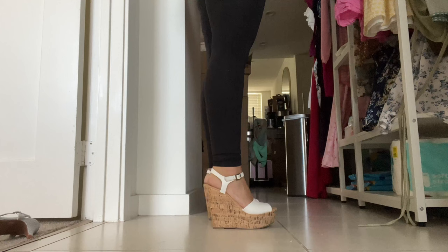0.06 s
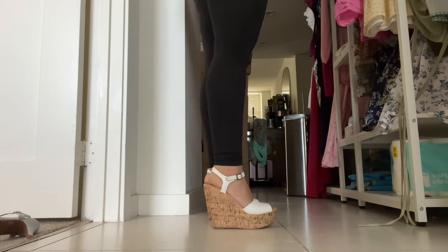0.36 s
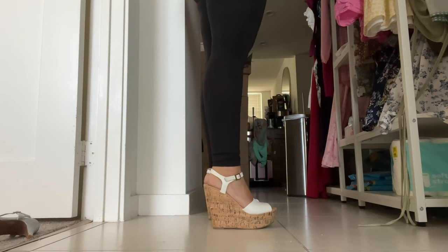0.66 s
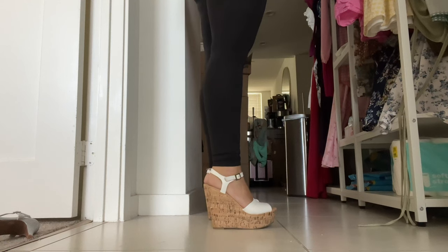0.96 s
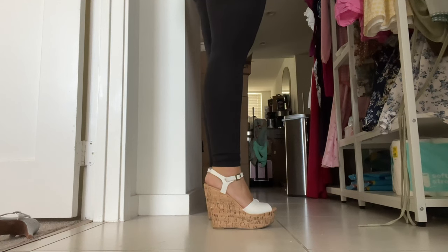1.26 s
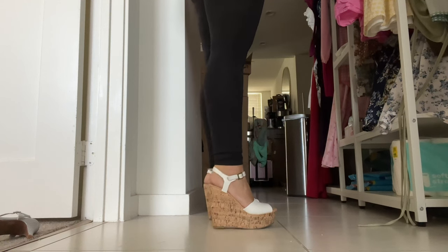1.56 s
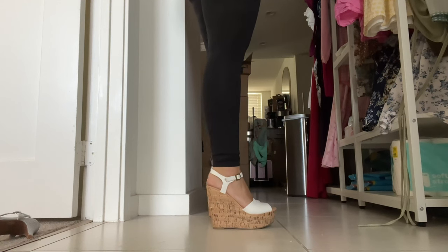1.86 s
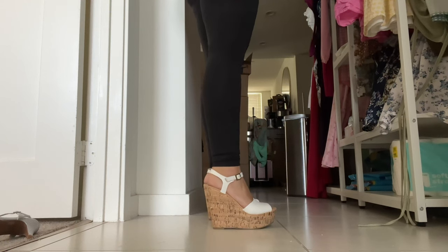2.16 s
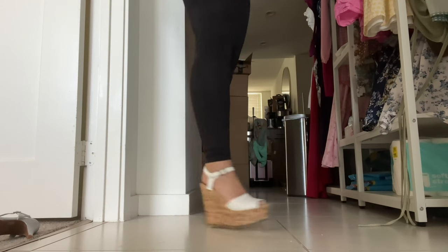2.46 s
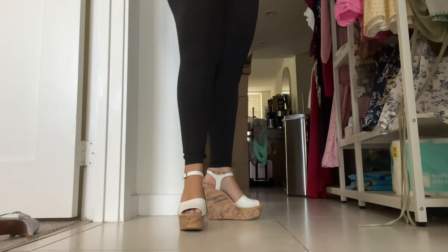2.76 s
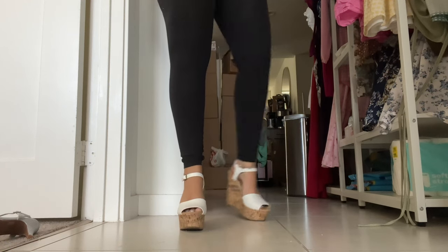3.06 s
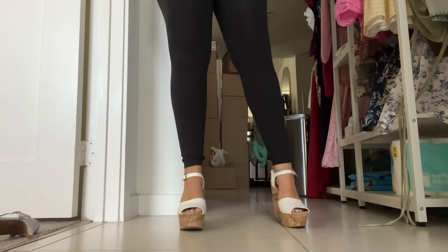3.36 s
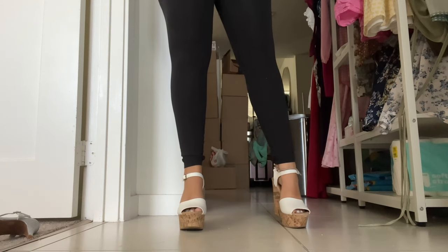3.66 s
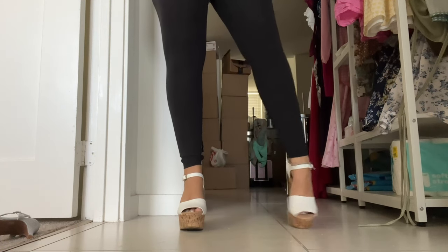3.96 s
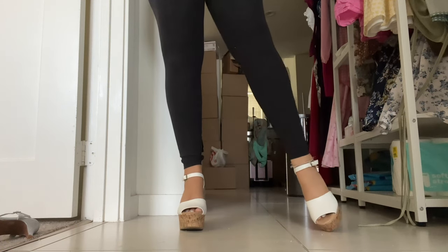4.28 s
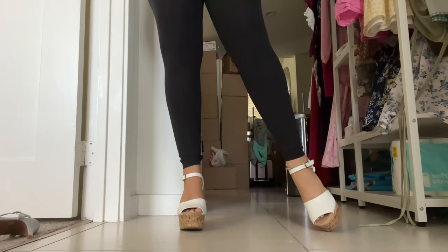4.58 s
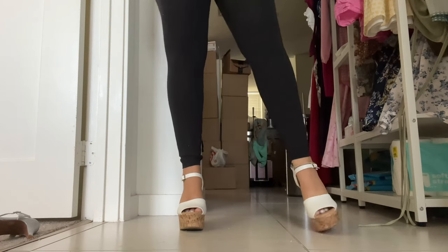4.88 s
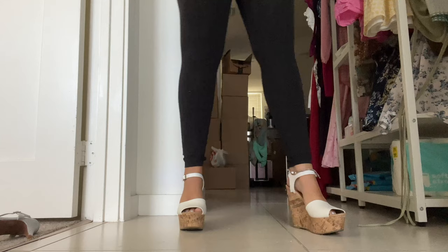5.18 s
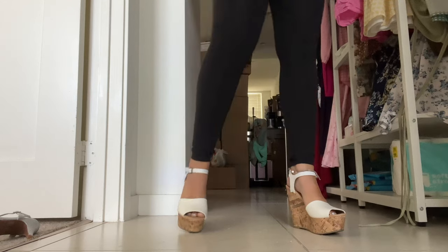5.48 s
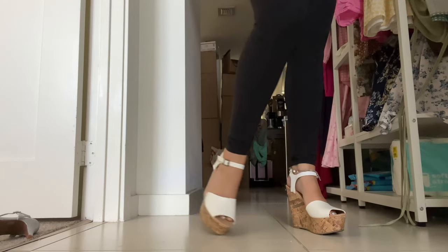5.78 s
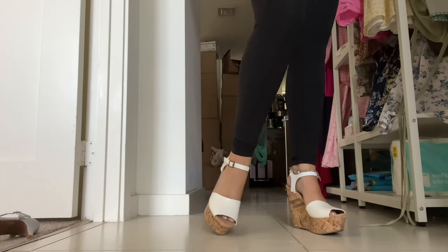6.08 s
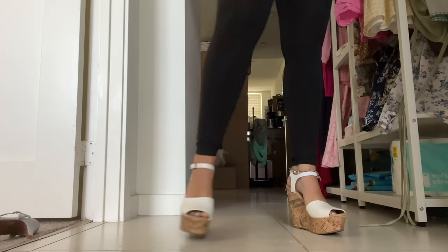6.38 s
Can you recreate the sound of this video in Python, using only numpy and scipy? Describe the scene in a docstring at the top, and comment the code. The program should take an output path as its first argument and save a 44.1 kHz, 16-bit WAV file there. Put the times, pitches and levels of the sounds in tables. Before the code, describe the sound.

A cork wedge sandal raps a tile floor five times in about two seconds, heard close at floor level in a narrow hallway. Softer, duller steps follow with longer gaps, one of them a heavier thud. Between them the leather straps creak and click, small buckles tick and leggings rustle faintly. A low appliance hum and room noise run underneath.

```python
"""Cork wedge sandals on a tiled floor in a narrow hallway, heard close by at floor level.
One foot raps the tile five times, then the wearer steps out and shifts her weight. Each blow arrives
through the tile, through the air and off the near walls, and excites the hallway's modes.
Straps creak, buckles ring, leggings rustle. An appliance hums; a faint whistle comes and goes."""
import sys
import numpy as np
from scipy import signal
from scipy.fft import rfft, irfft
from scipy.io import wavfile
from scipy.ndimage import uniform_filter1d

SR = 44100
rng = np.random.default_rng(int(sys.argv[2]) if len(sys.argv) > 2 else 0)


def waveform_to_disk(signal):
    """Save audio, clipped to [-1, 1], as 16-bit WAV at the path in sys.argv[1]."""
    frames = np.transpose(np.atleast_2d(signal))
    scaled = np.clip(frames, -1, 1) * 32767
    samples = np.round(scaled).astype(np.int16)
    wavfile.write(sys.argv[1], SR, samples)


N = 283563
TIME = np.arange(N) / SR
FFT_SIZE = 4096
HZ = np.fft.rfftfreq(FFT_SIZE, 1 / SR)

# sole on tile: (time [s], knock [dB], contact cut-off [Hz], thud [dB], grit [dB], pan L-R [dB],
# near-wall round trip [s], tile pitch [Hz])
FOOTFALLS = [(0.0594, -8.5, 1393, -28, -25.5, 1, 0.0039, 577),
             (0.564, -12, 1430, -21, -35, 0.5, 0.0044, 568),
             (0.9097, -12, 1510, -23, -31.5, -0.5, 0.0039, 570),
             (1.1390, -36.5, 1050, -27.5, -70, 6, 0.0034, 580),
             (1.1640, -46, 1220, -35.5, -64, -3.5, 0.0037, 545),
             (1.461, -18, 1110, -31.5, -44, 0, 0.0039, 570), (1.6731, -35, 690, -24, -48, 5, 0.00344, 515),
             (1.9248, -19, 1180, -29.5, -42.5, 0, 0.0039, 564),
             (2.693, -40.5, 900, -46, -77, 3, 0.0048, 547),
             (2.7252, -34, 428, -22.5, -70, 5.5, 0.00323, 364),
             (2.8245, -43.5, 810, -31, -56, 9, 0.00336, 427),
             (3.3133, -18, 537, -15.5, -36, 4.5, .0046, 411),
             (4.195, -54, 500, -42.5, -72, -3, 0.0034, 410), (5.039, -50.5, 70.6, -36, -75, 3, 0.0086, 410),
             (5.132, -39, 465, -28.5, -73, 0, 0.003, 414), (5.8130, -51.5, 1495, -45.5, -67, 7, .004, 558)]
# rubbing cloth: (frequency [Hz], level [dB])
CLOTH_SPECTRUM = [(600, -3.5), (1500, 2.5), (3000, 3), (5000, 0.5), (8000, -2), (13000, -2), (16000, -8.5)]


def from_db(db):
    return 10 ** (np.asarray(db) / 20)


def unit_rms(x):
    return x / np.sqrt(np.mean(x ** 2) + 1e-20)


def at_hz(rows, hz, column=1):
    """Interpolate a table column over log frequency."""
    table = np.array(rows)
    return np.interp(np.log(np.maximum(hz, 1)), np.log(table[:, 0]), table[:, column])


def delay(time_s):
    return np.exp(-2j * np.pi * HZ * time_s)


def add(out, time_s, sound):
    start = max(round(time_s * SR), 0)
    part = sound[..., :N - start]
    out[..., start:start + part.shape[-1]] += part


def swell(time_s, hold_s, attack_s, release_s, shape=1):
    """Envelope reaching 1 at time_s; shape 1 is pointed, 2 round."""
    before = np.maximum(time_s - TIME, 0) / attack_s
    after = np.maximum(TIME - time_s - hold_s, 0) / release_s
    return np.exp(-np.minimum(before + after, 10) ** shape)


def pulse(colour_db):
    """Spectrum of a minimum-phase pulse of height 1."""
    cepstrum = irfft(np.log(from_db(colour_db)))
    cepstrum[1:FFT_SIZE // 2] *= 2
    cepstrum[FFT_SIZE // 2 + 1:] = 0
    spectrum = np.exp(rfft(cepstrum))
    return spectrum / np.abs(irfft(spectrum)).max()


def stereo_noise(spectrum, coherent_hz):
    """Coloured noise, rms 1, alike in both ears well below coherent_hz."""
    hz = np.fft.rfftfreq(N, 1 / SR)
    mid, side = rfft(rng.standard_normal((2, N)))
    coherence = 1 / (1 + (hz / coherent_hz) ** 2)
    ears = np.sqrt(1 + coherence) * mid + np.sqrt(1 - coherence) * side * [[1], [-1]]
    return unit_rms(irfft(ears * from_db(at_hz(spectrum, hz)), N))


def house(noise_db, low_cut_hz):
    """Rumble and hiss of the house, plus an appliance's hum."""
    # room noise: (frequency [Hz], relative density [dB])
    noise_spectrum = [(13, -74.5), (22, -44), (59, -1), (118, -5.5), (147, -13.5), (210, -10.5),
                      (235, -18.5), (396, -22.5), (550, -23), (667, -28), (1330, -35), (1650, -43.5),
                      (1850, -46), (4840, -65), (15800, -75)]
    # appliance tones: (frequency [Hz], rms level [dB])
    hum_tones = [(118.4, -60.5), (209.9, -60.5), (328.4, -75.5)]
    air = from_db(noise_db) * stereo_noise(noise_spectrum, coherent_hz=325)
    air = signal.sosfilt(signal.butter(3, low_cut_hz, "high", fs=SR, output="sos"), air)
    hum = sum(from_db(db) * np.sin(2 * np.pi * (hz * TIME + rng.random())) for hz, db in hum_tones)
    return air + np.sqrt(2) * hum


def air_path(dip_db, dip_hz):
    """Air carries click and thump; the dipped midrange is mostly radiated by the tile."""
    octaves = np.log2(np.maximum(HZ, 1) / dip_hz)
    return from_db(dip_db * np.exp(-octaves ** 2 / 2))


def bending_wave(gain, travel_s, air_s, top_hz, left_lag_s):
    """Higher bending waves run faster: a falling chirp that outruns the air."""
    khz = np.maximum(HZ, 1) / 1000
    mortar_khz = 0.5  # the mortar bed keeps longer waves from slowing further
    delay_s = 2 * travel_s * (np.sqrt(khz + mortar_khz) - np.sqrt(mortar_khz)) / khz - air_s
    radiated = khz ** 2 / (khz ** 2 + 0.099) / (1 + (HZ / top_hz) ** 4)
    return gain * radiated * np.array([delay(delay_s + left_lag_s), delay(delay_s)])


def micro_slips(t60_s):
    """Spectrum of a dying burst of uneven slips, energy 1."""
    burst = rng.standard_normal(FFT_SIZE) * rng.exponential(1, FFT_SIZE)
    burst *= from_db(-60 * TIME[:FFT_SIZE] / t60_s)
    return rfft(burst / np.linalg.norm(burst))


def near_walls(trip_s, dull_hz):
    """Response per ear: direct sound plus dulled reflections off walls, door and rack."""
    # reflections per ear: (delay [near-wall round trips], gain [linear])
    left_echoes = [(.42, 0.094), (.55, 0.21), (1.0, 0.53), (1.54, 0.53), (2.02, 0.083)]
    right_echoes = [(.47, 0.12), (0.902, 1), (1.069, 0.15), (1.272, 0.31), (2.051, 0.55)]
    lowpass = 1 / (1 + 1j * HZ / dull_hz)
    return np.array([1 + lowpass * sum(gain * delay(trips * trip_s) for trips, gain in ear)
                     for ear in (left_echoes, right_echoes)])


def steps(thud_send_db):
    """Knock, thud and grit per blow; softer contact loses treble. Returns near sound, room send."""
    # wedge and tile under a perfectly hard blow: (frequency [Hz], level [dB])
    knock_spectrum = [(100, -30.5), (250, -12), (440, -3), (570, -4.5), (720, -6), (950, -5.5),
                      (1280, -2.5), (1600, -10), (2300, -9), (3100, -6), (4000, -7), (5300, -29.5),
                      (7000, -30), (12000, -29)]
    # body weight arriving on the floor: (frequency [Hz], level [dB])
    thud_spectrum = [(40, -33.5), (100, -12), (190, -3.5), (300, 0.5), (430, -0.5), (650, -9), (1200, -32),
                     (3000, -54)]
    # dust crushed under the sole: (frequency [Hz], level [dB])
    grit_spectrum = [(500, -21.5), (2000, 5.5), (3500, 9), (7000, 1.5), (12000, -10.5), (16000, -17.5)]
    # plate modes: (ratio to tile pitch, width [Hz], lift [dB])
    tile_modes = [(1.0, 75, 9), (1.599, 69.9, 7), (2.0, 110, 1.5), (2.33, 109.1, -0.5)]
    near, send = np.zeros((2, N)), np.zeros(N)
    lead_s = 0.01  # room for the chirp ahead of the blow
    paths = air_path(dip_db=-7.5, dip_hz=730) + bending_wave(
        gain=2.8, travel_s=0.0066, air_s=0.0062, top_hz=2400, left_lag_s=0.00024)
    for time_s, knock_db, contact_hz, thud_db, grit_db, pan_db, trip_s, tile_hz in FOOTFALLS:
        contact_db = -10 * np.log10(1 + (HZ / contact_hz) ** 4)
        ring_db = sum(lift_db / (1 + (2 * (HZ - ratio * tile_hz) / width_hz) ** 2)
                      for ratio, width_hz, lift_db in tile_modes)
        knock = from_db(knock_db) * pulse(at_hz(knock_spectrum, HZ) + contact_db + ring_db)
        thud = from_db(thud_db) * pulse(at_hz(thud_spectrum, HZ) + contact_db)
        grit = from_db(grit_db) * pulse(at_hz(grit_spectrum, HZ))
        # the thud is air pushed from under the sole: no dispersion
        direct = (knock + grit * micro_slips(t60_s=0.005)) * paths + thud
        at_ears = direct * near_walls(trip_s, dull_hz=10900)
        to_room = knock + grit + from_db(thud_send_db) * thud
        pan = from_db([[pan_db / 2], [-pan_db / 2]])
        add(near, time_s - lead_s, irfft(at_ears * delay(lead_s)) * pan)
        add(send, time_s - lead_s, irfft(to_room * delay(lead_s)))
    return near, send


def hallway(send, build_s, gap_s, coherent_hz):
    """Dense room modes build up and die band by band, under a few strong standing waves."""
    # reverberation: (frequency [Hz], level re direct [dB], t60 [s])
    reverb = [(80, 13.5, 0.15), (199, 5.5, 0.35), (400, 4, 0.4), (660, 5.5, 0.057), (981, 5.5, 0.25),
              (2580, -1.5, 0.32), (4886, 1.5, 0.19), (14600, -2, 0.3)]
    # waves between the walls: (frequency [Hz], level [dB], t60 [s])
    standing_waves = [(124.1, -60.5, 0.3), (200.1, -45.5, 0.44), (241, -50, 0.1), (375.3, -51.5, 0.45),
                      (413.6, -54.5, 0.41), (479, -51, 0.26), (542.5, -45.5, 0.22), (840, -56, 0.1),
                      (887, -47.5, .26), (975, -51.5, 0.25), (1115, -58, 0.33)]
    t = TIME[:SR]
    hz = np.fft.rfftfreq(SR, 1 / SR)
    bands_hz = np.geomspace(60, 15360, 9)
    modes_hz = np.arange(40, 16000, 9)
    modes_hz += rng.integers(-3, 4, len(modes_hz))
    phase_cycles = rng.random(len(modes_hz))
    # long waves reach both ears in step, short ones at any phase
    skew_cycles = rng.uniform(-0.82, 1, len(modes_hz)) / 4 * np.minimum(modes_hz / coherent_hz, 2)
    modes = np.zeros((2, len(hz)), complex)
    modes[:, modes_hz] = np.exp(2j * np.pi * (phase_cycles + skew_cycles * [[1], [-1]] / 2))
    modes = rfft(unit_rms(irfft(modes, SR))) * from_db(at_hz(reverb, hz))
    build = 1 - np.exp(-np.maximum(t - gap_s, 0) / build_s)
    response = np.zeros((2, SR))
    for band_hz, weights in zip(bands_hz, np.eye(len(bands_hz))):
        band = irfft(modes * at_hz(np.c_[bands_hz, weights], hz), SR)
        envelope = build * from_db(-60 * t / at_hz(reverb, band_hz, column=2))
        response += band * envelope / np.linalg.norm(envelope)
    ear_lag_s = np.array([[0.0004], [0]])
    for mode_hz, db, t60_s in standing_waves:
        phase = 2 * np.pi * (rng.random() - mode_hz * ear_lag_s)
        response += build * from_db(db - 60 * t / t60_s) * np.sin(2 * np.pi * mode_hz * t + phase)
    return signal.fftconvolve(send[None], response, axes=1)[:, :N]


def fibres(clicks_per_s):
    """Threads snap free: fine clicks of uneven size and pan, rms 1."""
    sizes = from_db(3.7 * np.minimum(rng.exponential(1, N), 3)) * rng.choice([-1, 1], N)
    clicks = (rng.random(N) < clicks_per_s / SR) * sizes * rng.uniform(0.45, 1, (2, N))
    colour = from_db(at_hz(CLOTH_SPECTRUM, np.fft.rfftfreq(N, 1 / SR)))
    return unit_rms(irfft(rfft(clicks) * colour, N))


def leggings(rest_db, shake_db, grain_db, catch_db, fibre_db):
    """Cloth brushes as a leg moves and shakes with each thud, catching and letting go."""
    # leg movements: (centre [s], peak [dB], half length [s])
    brushes = [(0.06, -61.5, 0.071), (0.424, -72, 0.056), (0.61, -62, 0.076), (0.82, -72, 0.18),
               (1.02, -70, .05), (1.39, -73, 0.084), (1.577, -72, 0.065), (1.814, -68, 0.056),
               (2.186, -72.5, 0.11), (2.387, -69, 0.056), (2.58, -70, 0.1), (2.897, -60.5, 0.058),
               (3.03, -63.5, 0.1), (3.27, -70.5, 0.12), (3.861, -71, 0.05), (3.996, -69.5, 0.06),
               (4.196, -73, 0.015), (4.792, -76, 0.029), (4.89, -79, 0.13), (5.09, -73, .05),
               (5.385, -69.5, 0.12), (5.443, -66.5, 0.031), (5.58, -71, 0.15), (6.237, -73, 0.059)]
    grain = unit_rms(uniform_filter1d(rng.standard_normal(N), size=40))
    catch = unit_rms(uniform_filter1d(rng.standard_normal(N), size=700))
    power = from_db(rest_db) ** 2
    for time_s, db, half_s in brushes:
        power += (from_db(db) * swell(time_s, 0, half_s, half_s, shape=1.4)) ** 2
    for time_s, _, _, thud_db, *_ in FOOTFALLS:
        shake = swell(time_s, 0, attack_s=0.0088, release_s=0.076)
        power += (from_db(shake_db + 0.5 * thud_db) * shake) ** 2
    rub = stereo_noise(CLOTH_SPECTRUM, coherent_hz=800)
    clicks = from_db(fibre_db) * fibres(clicks_per_s=700)
    return np.sqrt(power) * from_db(grain_db * grain + catch_db * catch) * (rub + clicks)


def whistle(width_hz, sag_hz_per_s, fade_db_per_s, edge_s):
    """A thin, wavering whistle that sags in pitch and level each time it sounds."""
    # whistles: (start [s], length [s], level [dB], pitch [Hz])
    whistles = [(1.205, .04, -78.5, 5230), (1.34, 0.046, -77, 5130), (1.62, .1, -76, 5300),
                (3.516, 0.046, -80, 5150), (5.612, 0.64, -75, 5240)]
    lowpass = signal.butter(2, width_hz / 2, fs=SR, output="sos")
    waver = unit_rms(signal.sosfilt(lowpass, rng.standard_normal((2, N))))
    tones = np.zeros(N)
    for start_s, length_s, db, hz in whistles:
        age_s = TIME - start_s
        pitch_hz = hz - sag_hz_per_s * age_s
        gate = swell(start_s, length_s, edge_s, edge_s, shape=1.654)
        tones += from_db(db - fade_db_per_s * age_s) * gate * np.sin(2 * np.pi * np.cumsum(pitch_hz) / SR)
    return np.sqrt(2) * waver * tones


def straps(creak_share, buckle_t60_s):
    """Leather lets go with a click, creaks and rings a buckle. Returns near sound, room send."""
    # strap ticks: (time [s], creak [dB], snap [dB], buckle ring [dB], ring pitch [Hz])
    ticks = [(1.5443, -58, -47, -68, 2280), (1.833, -71, -49, -67, 3480), (1.9962, -51, -47, -64, 2330),
             (2.341, -49.5, -68, -62, 2440), (2.3516, -49, -41.5, -78, 2640),
             (2.8036, -42, -36.5, -74, 2600), (2.9972, -42, -33.5, -39, 2700), (3.023, -49, -64, -66, 2320),
             (3.0564, -47, -54, -61, 2320), (3.0907, -50, -68, -56, 2290), (3.195, -37.5, -44, -42, 2380),
             (3.721, -51.5, -71, -59, 4020), (3.8747, -47, -54, -61, 2600), (3.9693, -48.5, -57, -61, 2560),
             (3.9938, -42.5, -51, -55, 2580), (4.048, -44.5, -50, -58, 2600),
             (4.8274, -53.5, -66, -66.5, 3020), (4.854, -53, -60, -75, 3070),
             (5.0728, -46.5, -38, -78, 2560), (5.4215, -56, -44, -58, 2620), (5.444, -54, -43, -58, 2720),
             (5.5505, -35.5, -61, -39.5, 2220), (5.5715, -38.5, -36, -59, 1580),
             (5.7473, -46.5, -65, -59, 2350), (6.2349, -66.5, -52.5, -79, 2580)]
    # leather creak: (frequency [Hz], level [dB])
    leather_spectrum = [(400, -58.5), (1100, 4.5), (1500, 0), (2050, -4.5), (2700, -6.5), (3300, -3.5),
                        (4500, -10), (7000, -17.5), (15000, -36)]
    # bright edge of a tick: (frequency [Hz], level [dB])
    snap_spectrum = [(1500, -2), (4000, -9), (7000, 0), (11000, 3), (14000, 0), (16000, -8)]
    near, send = np.zeros((2, N)), np.zeros(N)
    t = TIME[:FFT_SIZE]
    walls = near_walls(trip_s=0.003, dull_hz=1800)
    leather, snap = pulse(at_hz(leather_spectrum, HZ)), pulse(at_hz(snap_spectrum, HZ))
    for time_s, creak_db, snap_db, ring_db, ring_hz in ticks:
        slip = np.sqrt(1 - creak_share) + np.sqrt(creak_share) * micro_slips(t60_s=0.03)
        buckle = rfft(np.sin(2 * np.pi * ring_hz * t) * from_db(ring_db - 60 * t / buckle_t60_s))
        tick = (from_db(creak_db) * leather + from_db(snap_db) * snap) * slip + buckle
        add(near, time_s, irfft(tick * walls))
        add(send, time_s, irfft(tick))
    return near, send


def scene():
    """Steps and straps in the hallway, over cloth, house noise and whistle."""
    step_near, step_send = steps(thud_send_db=-4.5)
    strap_near, strap_send = straps(creak_share=0.64, buckle_t60_s=0.012)
    room = hallway(step_send + from_db(-4.5) * strap_send, build_s=0.002, gap_s=0.0048, coherent_hz=150)
    cloth = leggings(rest_db=-84.5, shake_db=-54.5, grain_db=-1.25, catch_db=0.74, fibre_db=-10.5)
    background = house(noise_db=-50, low_cut_hz=35)
    whistling = whistle(width_hz=420, sag_hz_per_s=330, fade_db_per_s=14, edge_s=0.03)
    return step_near + strap_near + room + cloth + background + whistling


def record(dry):
    """Steep elliptic low-pass."""
    cutoff_hz = 15850
    return signal.sosfilt(signal.ellip(10, 0.1, 70, cutoff_hz, fs=SR, output="sos"), dry)


dry = scene()
out = record(dry)
waveform_to_disk(out)
```